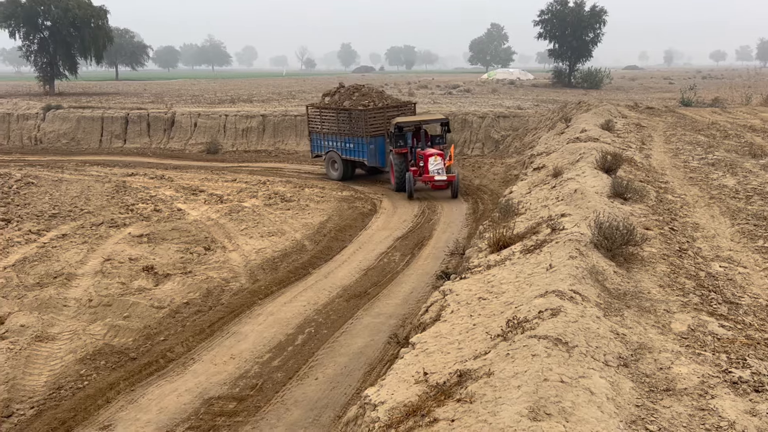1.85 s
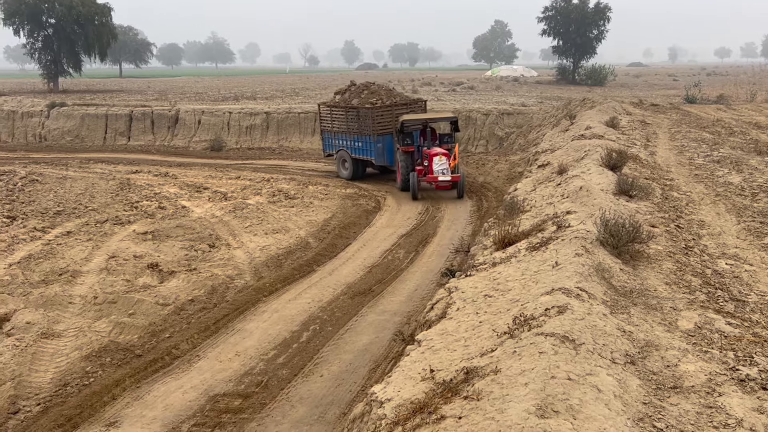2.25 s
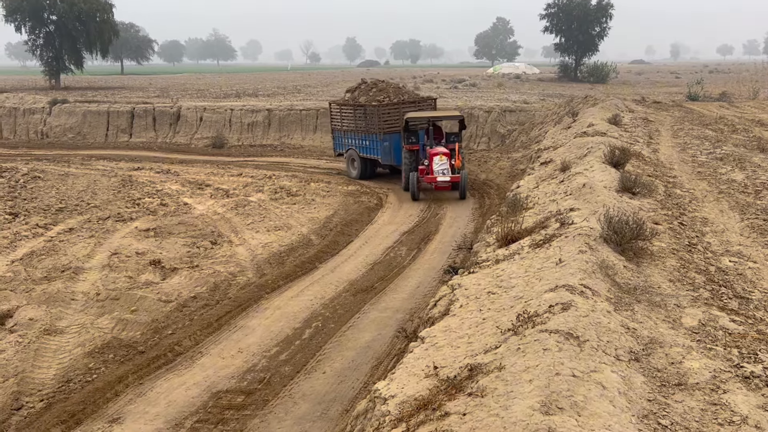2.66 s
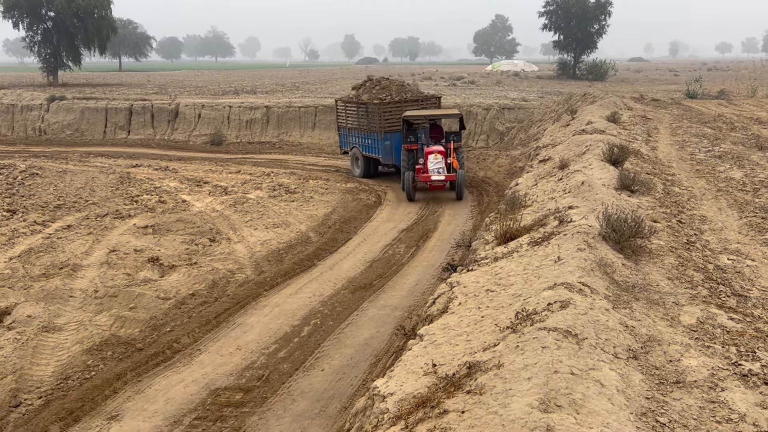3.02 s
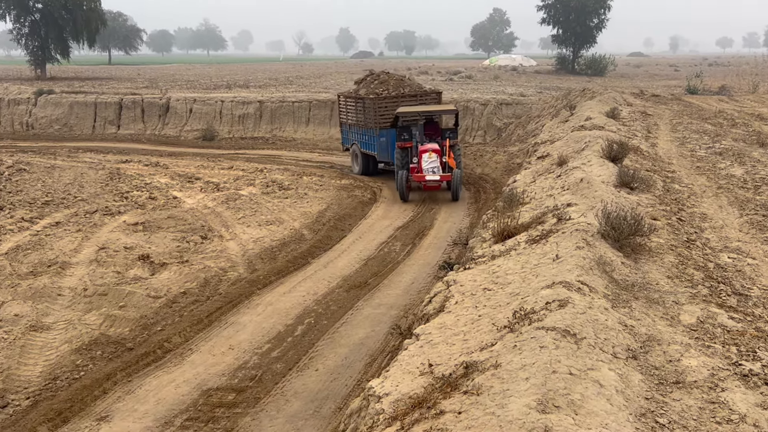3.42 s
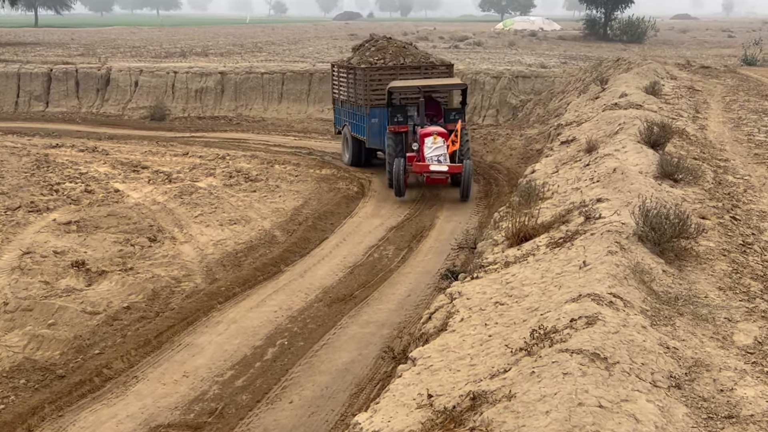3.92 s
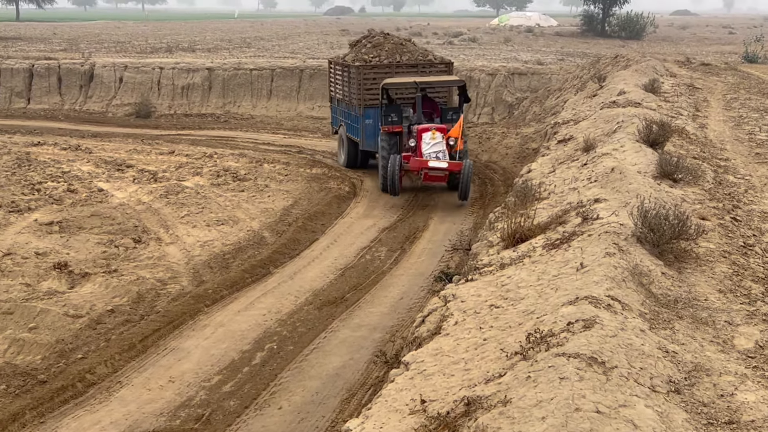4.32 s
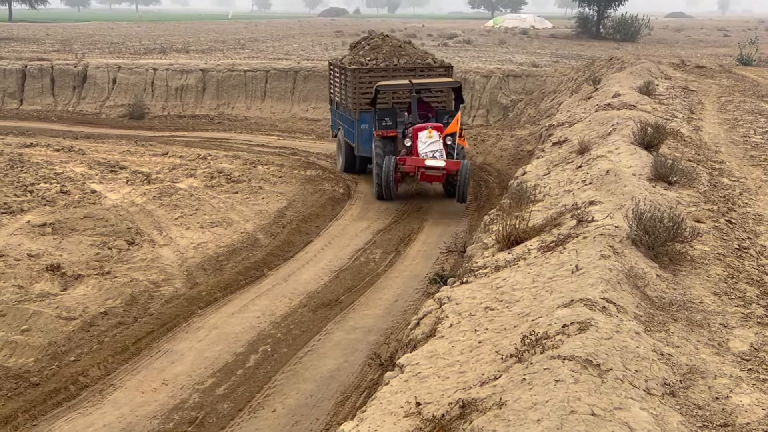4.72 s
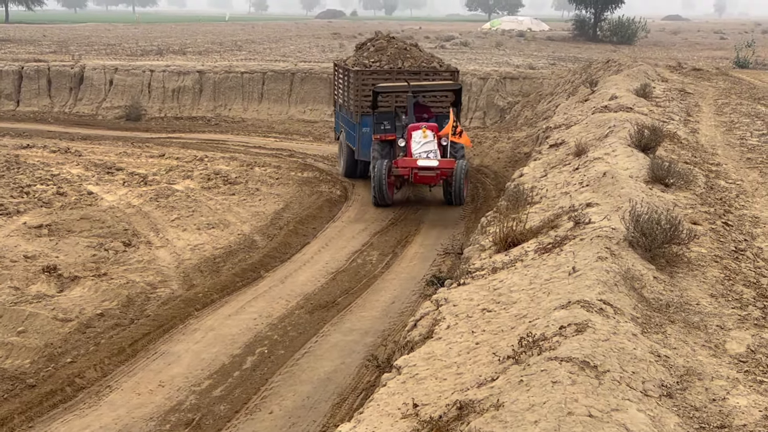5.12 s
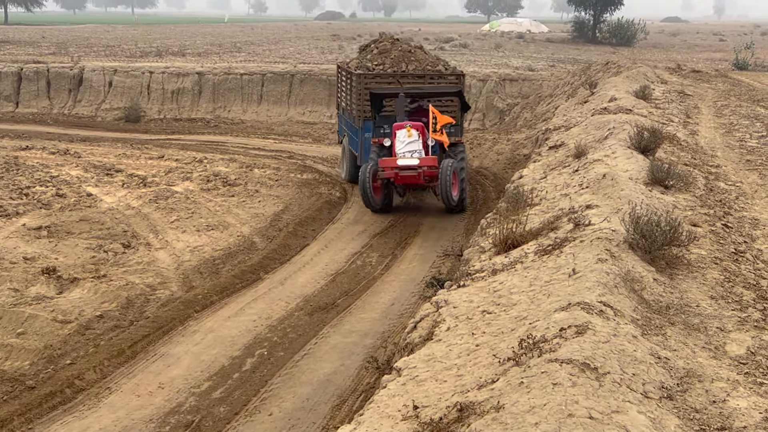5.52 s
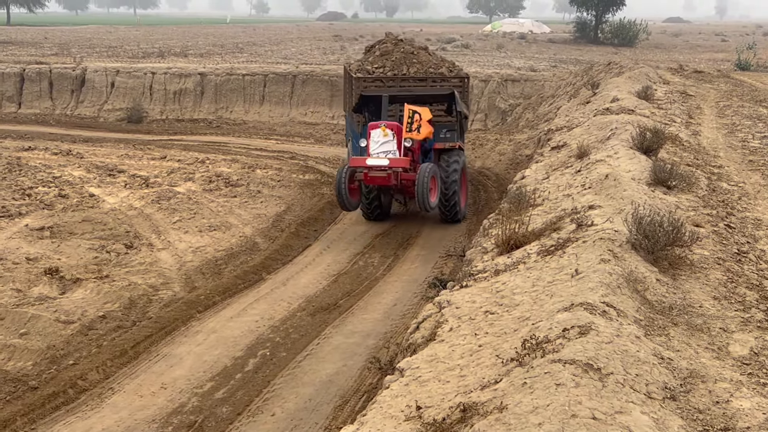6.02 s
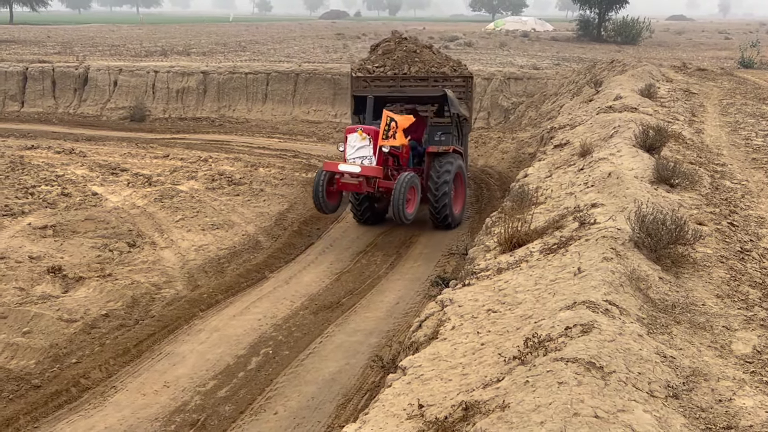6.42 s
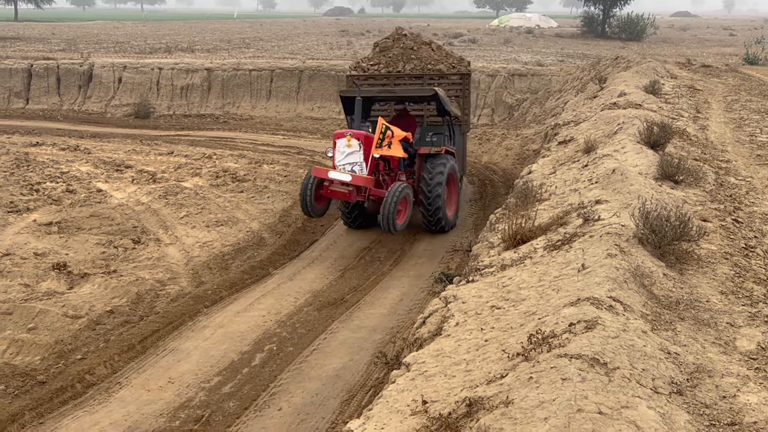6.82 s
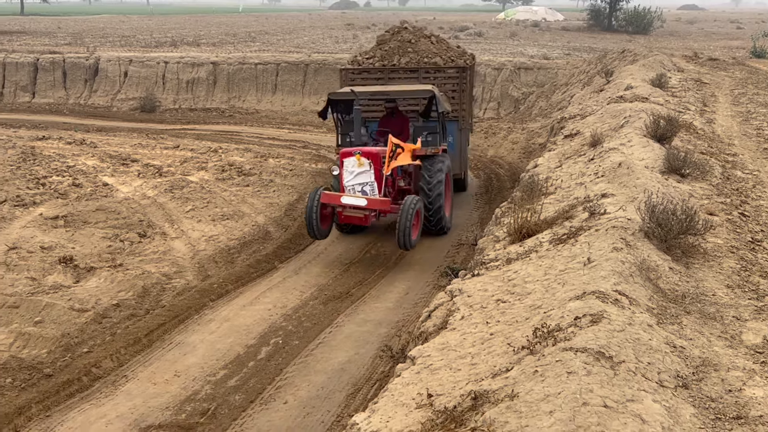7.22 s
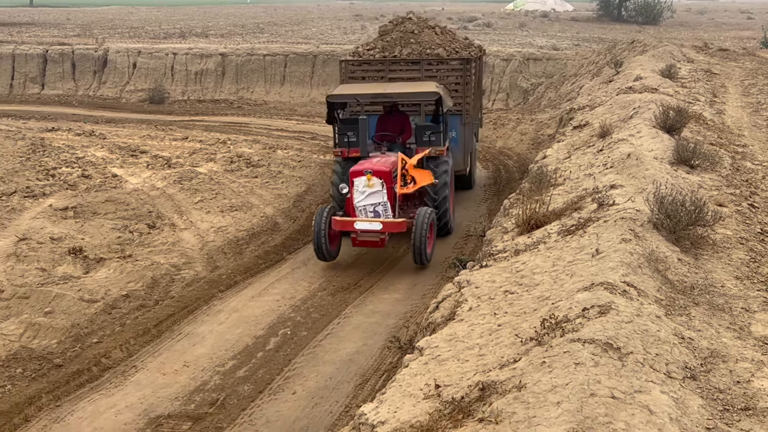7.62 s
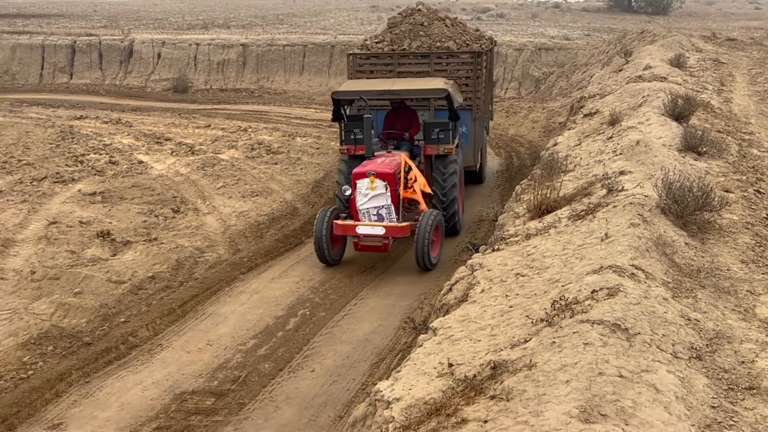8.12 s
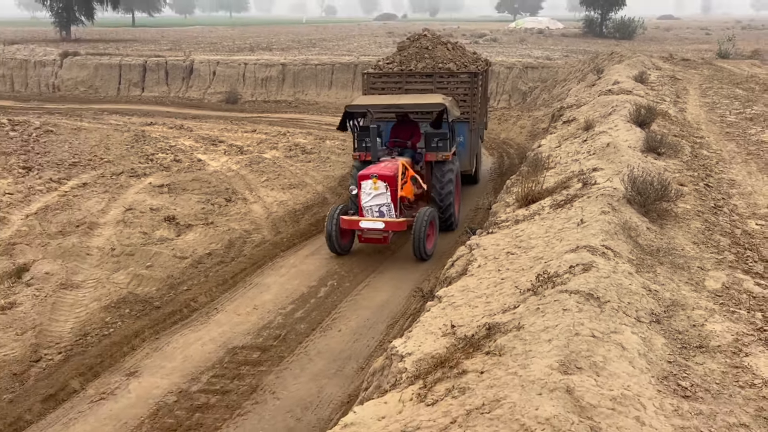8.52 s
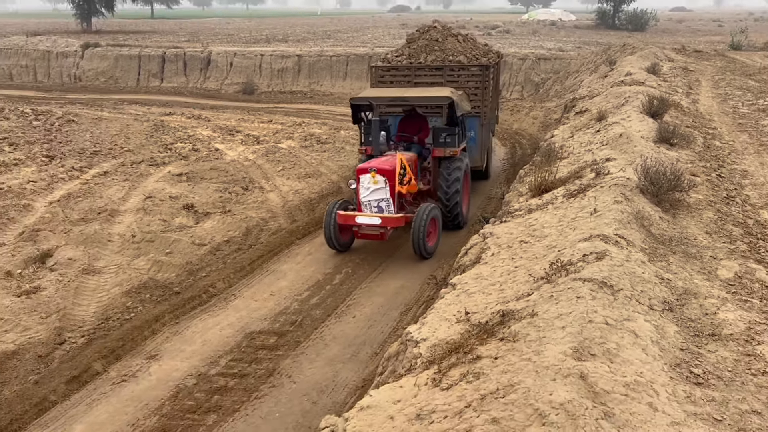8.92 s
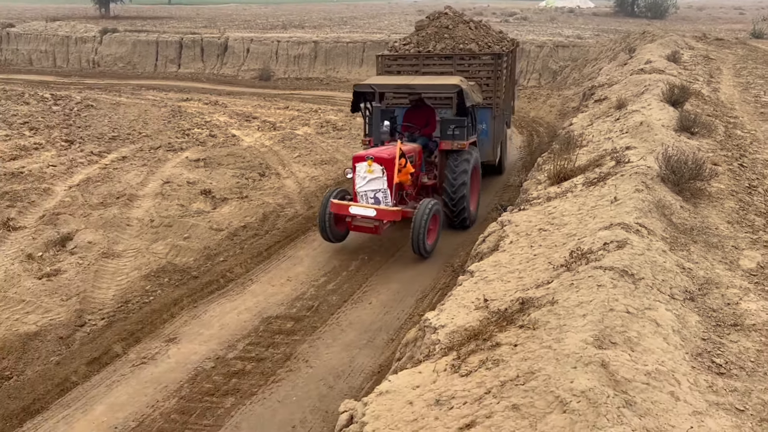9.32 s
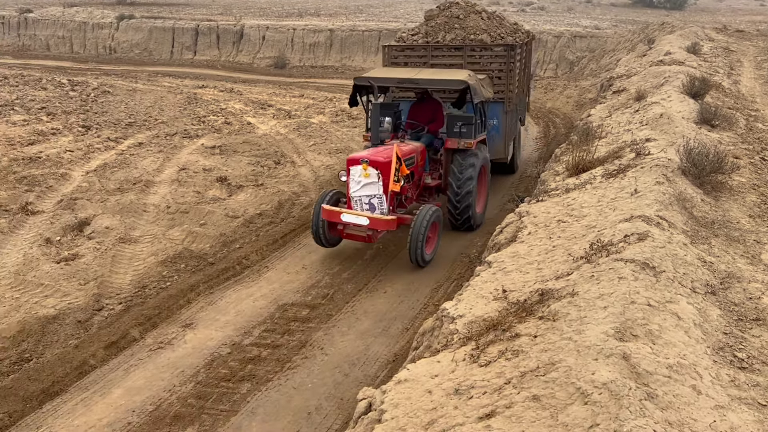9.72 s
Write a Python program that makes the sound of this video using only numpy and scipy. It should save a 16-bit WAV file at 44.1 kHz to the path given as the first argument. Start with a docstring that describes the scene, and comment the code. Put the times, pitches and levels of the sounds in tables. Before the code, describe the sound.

Outdoors, a laboring tractor engine clatters at fast idle, surges with barking exhaust and hiss, and steadily grows nearer and louder.

```python
"""A diesel tractor hauls a loaded trolley up a dirt track towards a phone, speeding up as it comes.
Each firing gives a harmonic pressure pulse from the exhaust and a noisy bark of gas.
Turbulent flow rumbles beneath as filtered noise, the block clatters and knocks in noise bursts,
gears whine as sines, panels ring as resonances and a hiss swells with the effort.
Ground, bank and bodywork reflect the sound; a second draw of the noises spreads it in stereo."""
import sys
import numpy as np
from scipy import signal
from scipy.fft import rfft, irfft
from scipy.io import wavfile
from scipy.ndimage import uniform_filter1d, map_coordinates

SR = 44100
rng = np.random.default_rng(int(sys.argv[2]) if len(sys.argv) > 2 else 0)


def wav_out(sig):
    """Save sig, one row per channel (or a flat mono array), as 16-bit PCM at SR to the path in sys.argv[1]."""
    wavfile.write(sys.argv[1], SR, np.round(np.clip(np.atleast_2d(sig).T, -1, 1) * 32767).astype(np.int16))


N = 439236

# Engine speed. Each row: time in seconds, firing rate in Hz.
ENGINE_SPEED = [(0, 65.3), (.95, 64.2), (1.5, 61.8), (2, 66.4), (2.65, 73.6), (3, 74.4), (3.25, 76.4),
                (4.25, 78.4), (4.7, 80.4), (5.05, 79.4), (5.5, 79.2), (5.85, 80.3), (6.45, 79.4),
                (6.75, 78.1), (7.05, 79.1), (7.45, 78.3), (8.25, 82.6), (9.96, 85.2)]


def firing_rate():
    """Periodic excitation: the firing rate (Hz) is the fundamental of every pitched layer."""
    return curves(ENGINE_SPEED)[0]


# How hard the engine pulls. Each row: time in seconds, load from 0 to 1.
ENGINE_LOAD = [(0, 0.08), (1.35, 0), (1.7, 0.3), (2.25, 0.61), (3.0, 0.29), (3.45, 0.52), (3.85, 0.87),
               (4.35, 0.88), (4.75, 0.76), (5.2, 0.89), (5.6, 0.91), (5.88, 0.69), (7.05, 0.63),
               (7.4, 0.91), (7.68, 0.86), (8.3, 0.5), (9.15, 0.57), (9.96, 0.43)]
# Short stabs of throttle. Each row: centre in seconds, length in seconds, added load.
THROTTLE_STABS = [(1.6, 0.12, 0.41), (1.88, 0.11, 0.18), (2.12, 0.19, 0.24), (3.2, .12, 0.2),
                  (3.65, 0.26, 0.11), (6.78, 0.28, 0.17)]


def effort():
    """Superposition of loads: the steady pull plus the stabs of throttle."""
    return np.maximum(curves(ENGINE_LOAD)[0] + bumps(THROTTLE_STABS), 0)


# The approach. Each row: time in seconds, distance in metres.
APPROACH = [(0, 24.8), (3, 23), (5.5, 20.9), (7.5, 17.75), (9.96, 12.3)]
REFERENCE_M = 24  # distance of unit gain


def nearness():
    """Inverse-distance law: pressure grows as one over the distance."""
    return REFERENCE_M / curves(APPROACH)[0]


IDLE_HZ = 65  # firing rate from which the level laws count octaves


def law_db(law, load):
    """Source strength rises with load and with the octaves of engine speed above idle."""
    idle_db, load_db, octave_db = law
    return idle_db + load_db * load + octave_db * np.log2(firing_rate() / IDLE_HZ)


# Boom at the firing rate. Each row: time in seconds, level in dB.
BOOM_LEVEL = [(0, -37), (.9, -33), (1.3, -25), (1.52, -16), (2.5, -16.5), (2.92, -27), (3.1, -19),
              (3.24, -8), (3.37, -41), (3.55, -72), (3.68, -17), (4.05, -17.5), (4.35, -13.5), (4.65, -16),
              (5.3, -12.5), (6.35, -15.5), (6.75, -9), (7.15, -15.5), (7.68, -11.5), (8.05, -25.5),
              (9.96, -27)]
# Drone at twice the firing rate. Each row: time in seconds, level in dB.
DRONE_LEVEL = [(0, -21), (.55, -23), (1.5, -15), (2.1, -17.5), (2.7, -23), (3.2, -17), (3.45, -20.5),
               (3.7, -17.5), (4.6, -22), (5.15, -16), (5.6, -18.5), (5.85, -27.5), (6.8, -20.5),
               (7.35, -14), (7.9, -16), (8.3, -25.5), (9.2, -13), (9.55, -19), (9.96, -18)]
# Third harmonic. Each row: time in seconds, level in dB.
THIRD_LEVEL = [(0, -40), (1.3, -42), (2.1, -39), (2.45, -22), (2.9, -28), (3.45, -29), (3.85, -15),
               (4.2, -19), (4.35, -13.5), (4.68, -22.5), (5.1, -17.5), (5.58, -16), (5.8, -24),
               (6.5, -28.5), (6.8, -21.5), (6.98, -26.5), (7.45, -11.5), (7.8, -16.5), (8.27, -25.5),
               (9.2, -16.5), (9.5, -23.5), (9.96, -23)]
# Growl of the fourth harmonic and above. Each row: time in seconds, level in dB before the pipe's gain.
GROWL_LEVEL = [(0, -21), (1.35, -26), (1.6, -14), (2.1, -10), (2.3, -15), (2.72, -8.5), (2.98, -24),
               (3.2, -8.5), (3.36, -15), (3.7, -3.5), (4.1, -7), (4.35, -3.5), (4.75, -15.5), (5, -6.5),
               (5.58, -5), (5.78, -18.5), (6.5, -16), (6.8, -10.5), (7.1, -15), (7.35, -7), (7.75, -5),
               (8.2, -18), (9.2, -7.5), (9.96, -4.5)]
# Gain of the exhaust pipe with its resonances. Each row: frequency in Hz, gain in dB.
PIPE_RESONANCES = [(245, -17), (262, -15), (280, -22), (298, -14.5), (318, -15), (328, -20.5), (342, -15.5),
                   (365, -29), (383, -21), (396, -28.5), (412, -24.5), (470, -37.5), (530, -31),
                   (560, -31.5), (620, -37)]
STAB_BRIGHT_DB = 18  # lift of the sixth harmonic and above when a stab adds a load of 1


def harmonic_levels(count=8):
    """Source and filter: the growl's overtones slide through the pipe's fixed resonances (dB)."""
    pipe_hz, pipe_db = np.transpose(PIPE_RESONANCES)
    rate = firing_rate()
    growl_db = curves(GROWL_LEVEL)[0]
    bright_db = STAB_BRIGHT_DB * np.sqrt(bumps(THROTTLE_STABS))
    levels = curves(BOOM_LEVEL) + curves(DRONE_LEVEL) + curves(THIRD_LEVEL)
    for k in range(4, count + 1):
        levels.append(np.interp(k * rate, pipe_hz, pipe_db) + growl_db + bright_db * (k >= 6))
    return levels


def exhaust(cycle, levels_db):
    """Fourier synthesis: overtones lagging a quarter turn make each dip fall sharply and recover slowly."""
    uneven_cycle = cycle + .003 * walk(70) + .003 * walk(8)  # uneven firings blur the note
    angle = 2 * np.pi * uneven_cycle
    note = 0
    for k, db in enumerate(levels_db, 1):
        lag = (k > 1) * np.pi / 2
        gain = undb(db + .5 * walk(25))
        note = note - np.cos(k * angle - lag + .25 * walk(2)) * gain
    return note


# Rough running, when the gas flow churns. Each row: centre in seconds, length in seconds, added dB.
CHURNS = [(1.95, 0.93, 5.5), (2.85, 0.64, 7), (3.8, 0.84, 5.5), (4.8, 0.68, 3), (5.75, 0.16, 2.5),
          (6.18, 0.3, 7), (8.05, 0.25, 3), (9.7, 0.43, -2)]
LUG_DEPTH, LUG_RATE_HZ = 0.24, 16  # spread of the wobble in dB for each dB of churn, and its rate


def lugging():
    """Amplitude modulation: the exhaust's gain wobbles at random during rough running."""
    return undb(LUG_DEPTH * bumps(CHURNS) * walk(LUG_RATE_HZ))


# Colour of the bark. Each row: frequency in Hz, relative level in dB per Hz.
BARK_SPECTRUM = [(500, -4.5), (1000, -9), (1700, 3), (2400, 4.5), (3100, 1), (4000, -8.5), (5200, -8.5),
                 (7000, -13), (10000, -23)]


def bark(cycle, bite):
    """Pulsed jet noise: gas cracks out as the pressure dips; off load it smears into a steady rush."""
    burst = puffs(cycle + .52, rise=.12, fall=.18, scatter_db=1)
    return colour(noise() * pulsed(burst, bite) * undb(.7 * walk(28)), BARK_SPECTRUM)


# Colour of the deep rumble. Each row: frequency in Hz, relative level in dB per Hz.
RUMBLE_SPECTRUM = [(12, -55), (25, -33), (33, -12), (45, -10), (60, 1.5), (100, -1), (135, -6.5),
                   (190, -11), (400, -56)]
# Colour of the roar. Each row: frequency in Hz, relative level in dB per Hz.
ROAR_SPECTRUM = [(80, -2.5), (140, 3), (200, 5), (300, 1.5), (390, -1), (470, -9), (800, -41)]
# Level of the roar. The entries: dB at idle, dB added by full load, dB per octave of engine speed.
ROAR_LEVEL_LAW = (-30, 0.93, 6.9)
RUMBLE_DB, RUMBLE_BOOM_SHARE = -20.5, 0.18  # offset, and dB of rumble for each dB of boom


def flow():
    """Turbulence noise: broadband gas flow rumbles and roars between the harmonics."""
    rumble_db = RUMBLE_DB + RUMBLE_BOOM_SHARE * curves(BOOM_LEVEL)[0]
    rumble = colour(noise(), RUMBLE_SPECTRUM) * undb(rumble_db)
    roar = colour(noise(), ROAR_SPECTRUM) * undb(law_db(ROAR_LEVEL_LAW, effort())) * nearness()
    return (rumble + roar) * undb(bumps(CHURNS))


# Colour of the clatter. Each row: frequency in Hz, relative level in dB per Hz.
CLATTER_SPECTRUM = [(300, -53), (480, -2.5), (670, -1), (780, -1.5), (950, -3.5), (1250, -5.5), (1750, -5),
                    (2150, -15), (3900, -15), (5200, -22), (6800, -15.5), (8500, -19.5), (11000, -28.5)]


def clatter(cycle, bite, knock=0.25, rattle_db=0.6):
    """Impact noise: combustion knocks the block at each firing; valves and loose metal rattle between."""
    burst = puffs(cycle + .45, rise=.1, fall=.25, scatter_db=1.3)
    share = np.clip(knock * bite, 0, 1)
    return colour(noise() * pulsed(burst, share) * undb(rattle_db * walk(350)), CLATTER_SPECTRUM)


# Bursts of hard diesel knock. Each row: centre in seconds, length in seconds, level in dB at
# the reference distance.
KNOCK_BURSTS = [(2.133, 0.11, -25), (3.205, 0.092, -28), (3.807, 0.27, -28), (4.3, 0.18, -28),
                (6.75, 0.11, -56)]
# Colour of the knock. Each row: frequency in Hz, relative level in dB per Hz.
KNOCK_SPECTRUM = [(400, -21), (900, 1.5), (1800, 8), (2700, 1), (3700, -4), (5000, -16), (9000, -14)]


def knocks(cycle):
    """Impulsive excitation: in set bursts each firing cracks hard and dies within a few milliseconds."""
    crack = puffs(cycle + .41, rise=.025, fall=.13, scatter_db=1)
    gains = [(s, length, undb(db)) for s, length, db in KNOCK_BURSTS]
    return colour(noise() * crack, KNOCK_SPECTRUM) * bumps(gains)


# Modes of the gearbox shell. Each row: frequency in Hz, width in Hz, relative level in dB.
SHELL_MODES = [(569, 33, 1.5), (641, 65, -2.5), (685, 41, -9)]
# Modes of the bonnet. Each row: frequency in Hz, width in Hz, relative level in dB.
BONNET_MODES = [(780, 81, -0.83), (876, 46, 0.16), (1013, 110, -1.4)]
# Level of their ringing. Each row: time in seconds, shell level in dB, bonnet level in dB.
RINGING_LEVEL = [(0, -57, -65), (1.15, -55, -48), (1.7, -50, -34), (3.1, -44, -34.5), (3.22, -46, -29),
                 (3.35, -50, -33), (3.7, -40, -31.5), (4.6, -32.5, -34), (5.2, -30, -36), (5.9, -31, -42),
                 (6.9, -36, -44), (7.5, -32, -38), (8.2, -42, -45), (9.96, -35, -29.5)]


def panels(cycle):
    """Modal resonance: each firing shakes the gearbox shell and the bonnet, which ring briefly."""
    hz = np.fft.rfftfreq(N, 1 / SR) + 1
    out = 0
    for modes, level_db in zip((SHELL_MODES, BONNET_MODES), curves(RINGING_LEVEL)):
        response = sum(undb(db) / (1 + ((hz - f) / width) ** 2) ** 2 for f, width, db in modes)
        blows = noise() * puffs(cycle + .45, rise=.1, fall=.4, scatter_db=1)
        out = out + undb(level_db) * unit(irfft(rfft(blows) * response, N))
    return out


CASING_HZ, CASING_WIDTH_HZ, CASING_DB = 665, 39, 13.5  # resonance, its width, gain at its peak


def casing_db(hz):
    """Resonance: the gear casing lifts a tone that crosses its natural frequency."""
    return CASING_DB / (1 + ((hz - CASING_HZ) / CASING_WIDTH_HZ) ** 4)


# Tones of gears and fan; the two loudest lie slightly off the firing harmonics and beat with them.
# Each row: multiple of the firing rate, relative level in dB.
WHINE_TONES = [(4.05, -2.5), (7, -19), (8.1, -12), (9, -19), (11, -21)]


def whine(cycle):
    """Locked rotation: gears and fan sing in step with the engine, wavering in level and phase."""
    rate = firing_rate()
    tones = 0
    for k, db in WHINE_TONES:
        gain = np.sqrt(2) * undb(db + casing_db(k * rate) + 2.5 * walk(9))
        tones = tones + gain * np.sin(2 * np.pi * k * cycle + .035 * k * walk(10))
    return tones


# Colour of the hiss. Each row: frequency in Hz, relative level in dB per Hz.
HISS_SPECTRUM = [(1500, -11), (4000, 5.5), (5200, 2), (7000, 6.5), (9000, 7.5), (10500, 3.5), (13500, 2),
                 (15500, -0.5)]


def hiss(cycle, bite, pulsing=0.39):
    """Modulated broadband noise: a grainy high hiss throbs with the firings."""
    burst = puffs(cycle + .42, rise=.07, fall=.33, scatter_db=1.1)
    share = np.clip(pulsing * bite + 0.14, 0, 1)
    grain = undb(1.7 * walk(800) + .7 * walk(90) + .9 * walk(14))
    return colour(noise() * pulsed(burst, share) * grain, HISS_SPECTRUM)


# Levels of clatter, bark and hiss at the reference distance. The entries of each: dB at idle,
# dB added by full load, dB per octave of engine speed.
CLATTER_LEVEL_LAW = (-34, 6, 3.9)
BARK_LEVEL_LAW = (-40.5, 16.8, .5)
HISS_LEVEL_LAW = (-50.5, 14.4, 7.7)
# Jolts that rattle loose metal. Each row: centre in seconds, length in seconds, added dB.
JOLTS = [(1.28, 0.21, 3), (3.23, 0.085, 3), (3.6, 0.49, 2.5), (9.0, 0.27, 1)]
# Swells of the hiss. Each row: centre in seconds, length in seconds, added dB.
HISS_SWELLS = [(1.59, 0.47, 12.5), (1.88, 0.1, 5.5), (2.07, 0.19, 6), (2.45, 0.065, 6), (3.68, 0.74, 3),
               (5.05, 0.15, 4), (5.58, 0.28, 6), (6.0, 0.15, 7.5), (6.17, 0.19, 7), (6.73, 0.18, 7.5),
               (7.22, 0.23, 4.5), (7.65, 1, 5.5), (8.97, 0.18, 2.5), (9.6, 1, 6.5)]
# The four cylinders sound unequal. Each entry: one cylinder's offset in dB, before the share below.
CYLINDER_OFFSETS = [1.6, 0.7, -0.77, -0.3]
# The pattern shows more as the tractor comes close. Each row: time in seconds, share of the offsets.
UNEVEN_SHARE = [(7.8, 0.43), (8.8, 0.64)]
BURST_LAG, LAG_PER_HZ, CRUISE_HZ = .09, .018, 79  # bursts trail (cycles), more below cruising speed
BITE_IDLE, BITE_LOAD, BITE_STAB = .12, 0.64, 0.65  # terms of the control of how far noise is in bursts


def upper(cycle):
    """Load dependence: clatter, bark and hiss bite harder under load; the bark follows its square."""
    load = effort()
    cycle = cycle - BURST_LAG - LAG_PER_HZ * np.maximum(CRUISE_HZ - firing_rate(), 0)
    count = len(CYLINDER_OFFSETS)
    cylinder_db = np.interp(cycle, np.arange(count), CYLINDER_OFFSETS, period=count)
    uneven = undb(curves(UNEVEN_SHARE)[0] * cylinder_db)
    bite = np.clip(BITE_IDLE + BITE_LOAD * load ** 2 + BITE_STAB * bumps(THROTTLE_STABS), 0, 1)
    block = undb(law_db(CLATTER_LEVEL_LAW, load) + bumps(JOLTS)) * clatter(cycle, bite)
    gas = undb(law_db(BARK_LEVEL_LAW, load ** 2)) * bark(cycle, bite)
    air = undb(law_db(HISS_LEVEL_LAW, load) + bumps(HISS_SWELLS)) * hiss(cycle, bite)
    return (block + gas + air + knocks(cycle)) * uneven * nearness()


def delayed(x, lag_ms):
    """Propagation delay: x heard over a path whose lag may change."""
    return map_coordinates(x, [np.arange(N) - lag_ms * SR / 1000], order=2)


# The ground reflection lags more as the tractor nears and rocks over the ruts.
# Each row: time in seconds, lag in milliseconds, strength from 0 to 1 against the direct sound.
GROUND_REFLECTION = [(0, .8, .08), (1.2, .78, .1), (1.6, .72, .36), (2, .7, .4), (2.7, .72, .3),
                     (3.3, .78, .12), (4.3, .86, .24), (5, .93, .22), (5.7, 1.01, .26), (6.4, 1.16, .14),
                     (7, 1.14, .2), (7.8, 1.06, .22), (8.1, 1.12, .12), (8.6, 1.17, .3), (9.2, 1.21, .3),
                     (9.96, 1.29, .2)]
BODY_SHARE = .11  # strength of each reflection off the bodywork
BANK_MS = 1.144  # lag off the bank at the reference distance; it grows as the tractor nears


def reflect(x, bank_share=0.039, soft_hz=6500):
    """Comb filtering: late copies off ground, bank and bodywork cut notches that slide."""
    soil = 1 / (1 + (np.fft.rfftfreq(N, 1 / SR) / soft_hz) ** 4)  # loose soil swallows the treble
    dull = irfft(rfft(x) * soil, N)
    body = sum(delayed(x, lag_ms + .06 * walk(1.3)) for lag_ms in (2.9, 4.3, 6.1, 9.7, 13.4))
    ground_ms, ground_share = curves(GROUND_REFLECTION)
    ground = ground_share * delayed(dull, ground_ms)
    bank = bank_share * delayed(x, BANK_MS * nearness())
    return (x + ground + bank + BODY_SHARE * body) / np.sqrt(1 + ground_share ** 2)


# Stereo spread, nearly absent from 2 to 7 kHz. Each row: frequency in Hz, gain in dB.
SIDE_SPECTRUM = [(60, -10.5), (400, -12), (950, -13), (1350, -4), (1650, -18), (2200, -45), (3600, -76),
                 (4600, -68), (7400, -61), (8500, -2), (9200, -27), (15000, -23)]
# Spells of wider treble. Each row: centre in seconds, length in seconds, share.
WIDE_SPELLS = [(1.5, 0.39, 0.18), (2.1, 1, 0.4), (3.15, 0.76, 0.69), (8.75, 0.23, 0.3), (9.6, .6, 0.32)]
# Colour of the wider treble. Each row: frequency in Hz, gain in dB before the share.
WIDE_SPECTRUM = [(1700, -38), (2400, -10), (3400, 2.5), (4300, -12), (5600, 3), (6800, -27), (10000, -25),
                 (11800, 4), (13200, -30)]


def side_noise(cycle):
    """Decorrelation: a second draw of the noises, opposite in sign left and right, spreads the sound."""
    second = rfft(flow() + upper(cycle))
    side = irfft(second * undb(per_bin(SIDE_SPECTRUM)), N)
    wide = bumps(WIDE_SPELLS) * irfft(second * undb(per_bin(WIDE_SPECTRUM)), N)
    return np.array([[1], [-1]]) * (side + wide)


# Three stereo images, crossfaded by time.
# Each row: frequency in Hz, lead of the left in radians, left minus right in dB.
OPENING_IMAGE = [(60, 0, 1), (450, 0, 1), (650, -.3, 6), (1000, -.6, 9), (1300, -.9, 6), (1520, -.8, 3),
                 (1620, -2.6, 5), (1710, 0, 0)]
MAIN_IMAGE = [(60, 0, 1), (400, 0, .5), (550, .8, 1), (660, .2, 7), (850, .1, 3), (1100, .4, 4),
              (1250, 1.2, 4), (1370, 3.14, 0), (1500, 4.3, -5), (1640, 4.7, -4), (1710, 6.28, 0)]
MIDDLE_IMAGE = [(60, 0, 1), (450, 0, .5), (660, .1, 4), (850, 0, 2.5), (1150, .25, 4), (1300, 1.3, 9),
                (1430, 3.14, 0), (1540, 4.2, -5), (1650, 4.6, -4), (1720, 6.1, -2), (1880, 5.7, -6),
                (1970, 6.1, -8), (2100, 6.28, 0)]
# Constant left-right phase in the treble, near opposite around 9.3 and 15 kHz.
# Each row: frequency in Hz, added lead of the left in radians.
TREBLE_PHASE = [(7500, 0), (8800, -1.88), (9050, -3.03), (9560, -3.03), (9750, 0), (13900, 0),
                (15300, -2.88)]
# Mix of the images; the rest is the main one. Each row: time in seconds, opening share from 0 to 1,
# middle share from 0 to 1.
IMAGE_SHARES = [(1.2, 1, 0), (1.35, 0, 0), (3.5, 0, 0), (3.62, 0, 1), (8.38, 0, 1), (8.52, 0, 0)]
# The midrange pattern of left and right wanders in frequency. Each row: time in seconds,
# mean shift in Hz.
MIDRANGE_SHIFT = [(1.3, 0), (1.7, 30), (2.1, -50), (2.7, -20), (3.3, 40), (3.7, -20), (4.5, -20), (5, 110),
                  (5.5, 110), (5.9, 0), (7.1, -10), (7.8, 60), (8.7, 30), (9.3, -10)]


def stereo_image(x, size=1024):
    """Interchannel phase and level: left and right differ by frequency, and the image changes in time."""
    hz, s, frames = signal.stft(x, SR, nperseg=size, noverlap=size * 3 // 4)
    at = np.minimum((s * SR).astype(int), N - 1)
    shift = (curves(MIDRANGE_SHIFT)[0] + 22 * walk(7))[at]
    midrange = np.interp(hz, [900, 1250, 1520, 1750], [0, 1, 1, 0])  # only the midrange wanders
    shifted = hz[:, None] - midrange[:, None] * shift
    opening, middle = (c[at] for c in curves(IMAGE_SHARES))
    treble = np.interp(hz, *np.transpose(TREBLE_PHASE))[:, None]
    images = ((OPENING_IMAGE, opening), (MAIN_IMAGE, 1 - opening - middle), (MIDDLE_IMAGE, middle))
    pair = 0
    for table, share in images:
        f, lead, db = np.transpose(table)
        half = undb(np.interp(shifted, f, db) / 2)  # half the level difference on each side
        right = np.exp(-1j * (np.interp(shifted, f, lead) + treble)) / half
        pair = pair + share * np.array([half, right])
    return signal.istft(frames * pair, SR, nperseg=size, noverlap=size * 3 // 4)[1][:, :N]


def undb(db):
    """Logarithmic level: decibels to gain."""
    return 10 ** (np.asarray(db) / 20)


def unit(x):
    """Normalisation: scale to rms 1."""
    return x / np.sqrt(np.mean(x ** 2))


def curves(table):
    """Linear interpolation: the columns of a time table, one value a sample."""
    s, *columns = np.transpose(table)
    return [np.interp(np.arange(N) / SR, s, c) for c in columns]


def bumps(table):
    """Gaussian envelopes: one for each (centre s, length at half height s, height) row, summed."""
    t = np.arange(0, N / SR, .004)
    shape = sum(height * .5 ** ((2 * (t - s) / length) ** 2) for s, length, height in table)
    return np.interp(np.arange(N) / SR, t, shape)


def per_bin(points):
    """Logarithmic frequency: a spectrum table read at every bin."""
    hz, value = np.transpose(points)
    bins = np.maximum(np.fft.rfftfreq(N, 1 / SR), 1)
    return np.interp(np.log(bins), np.log(hz), value)


def colour(x, points):
    """Spectral shaping: filter x by (Hz, dB) points; rms 1."""
    return unit(irfft(rfft(x) * undb(per_bin(points)), N))


def noise():
    """White noise: equal power at every frequency."""
    return rng.standard_normal(N)


def walk(rate):
    """Slow random modulation: levels drawn rate times a second and joined by ramps; spread near 1."""
    k = max(int(SR / rate), 1)
    steps = np.repeat(rng.standard_normal(N // k + 1), k)
    return 1.84 * uniform_filter1d(steps, k)[:N]


def puffs(cycle, rise, fall, scatter_db):
    """Pulse train: a burst of random size each cycle, with rise and fall in cycles; rms 1."""
    phase = cycle % 1
    sizes = undb(scatter_db * rng.standard_normal(size=4096))
    size = sizes[np.floor(cycle).astype(int)]
    return unit(size * (1 - np.exp(-phase / rise)) ** 2 * np.exp(-phase / fall))


def pulsed(burst, share):
    """Power sharing: an envelope with this share of its power in bursts and the rest steady."""
    return np.sqrt(share * burst ** 2 + 1 - share)


GEAR_DB = -10.5  # whine against the clatter's level law


def scene():
    """Common excitation: one crankshaft drives every layer."""
    cycle = np.cumsum(firing_rate()) / SR
    note = exhaust(cycle, harmonic_levels()) * lugging()
    gear_gain = undb(law_db(CLATTER_LEVEL_LAW, effort()) + GEAR_DB) * nearness()
    gears = gear_gain * whine(cycle)
    centre = note + gears + panels(cycle) + flow() + reflect(upper(cycle))
    return stereo_image(centre) + side_noise(cycle)


TOP_HZ = 15700  # edge of the treble cut


def record(dry):
    """Band limiting and soft saturation: the phone cuts deep bass, rounds high peaks and cuts the top."""
    thin = signal.sosfiltfilt(signal.butter(4, 33, "highpass", fs=SR, output="sos"), dry)
    rounded = thin / (1 + (thin / .97) ** 12) ** (1 / 12)
    return signal.sosfilt(signal.ellip(10, .2, 80, TOP_HZ, fs=SR, output="sos"), rounded)


dry = scene()
out = record(dry)
wav_out(out)
```